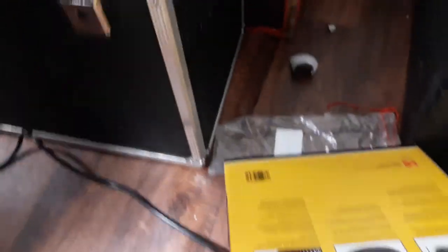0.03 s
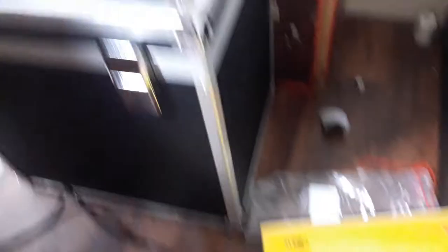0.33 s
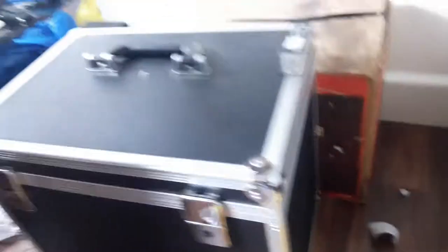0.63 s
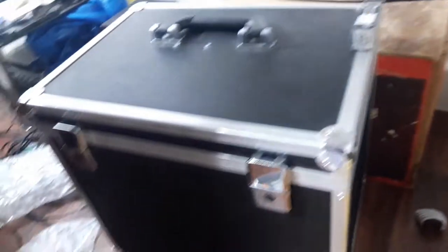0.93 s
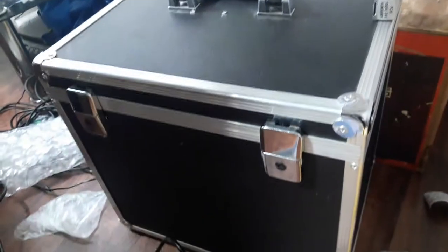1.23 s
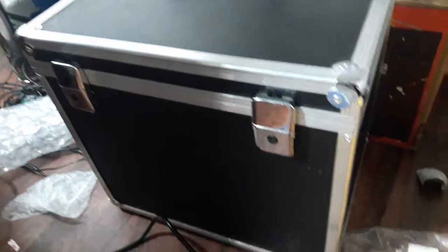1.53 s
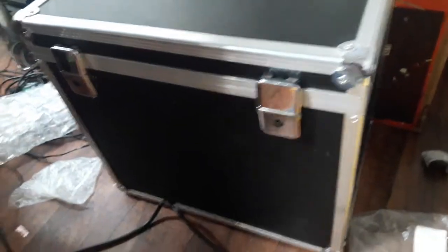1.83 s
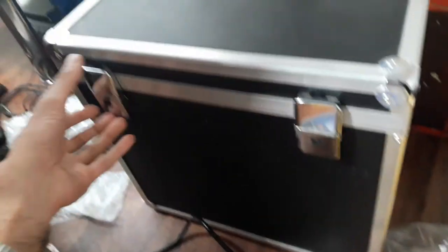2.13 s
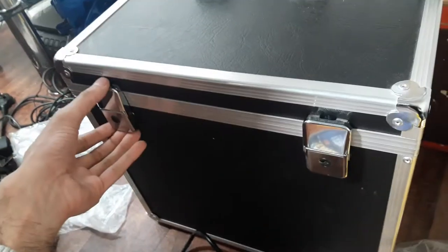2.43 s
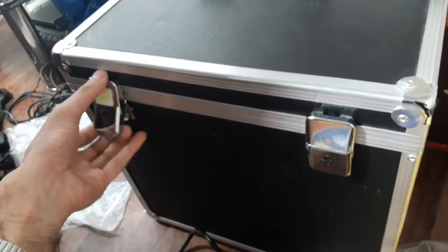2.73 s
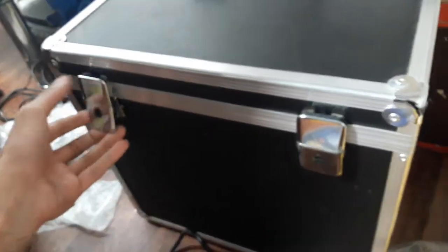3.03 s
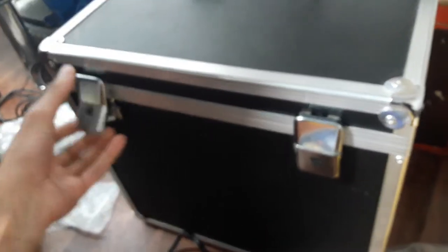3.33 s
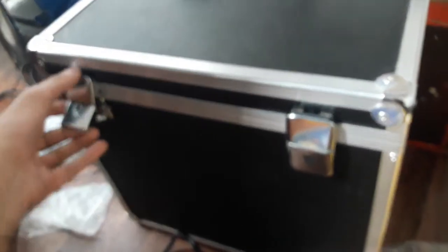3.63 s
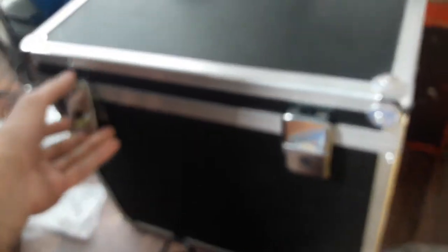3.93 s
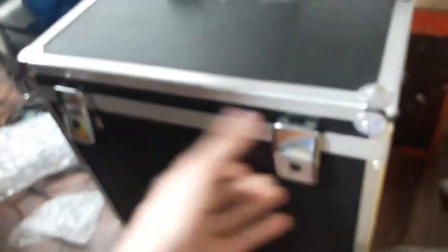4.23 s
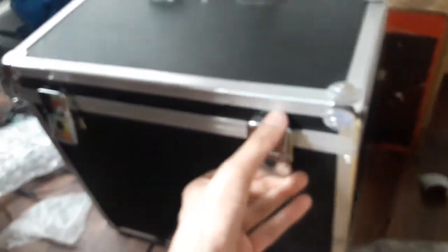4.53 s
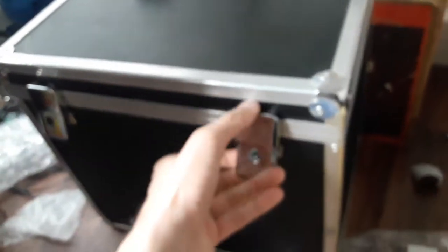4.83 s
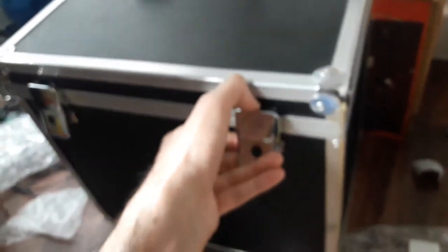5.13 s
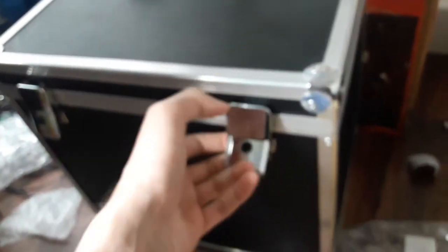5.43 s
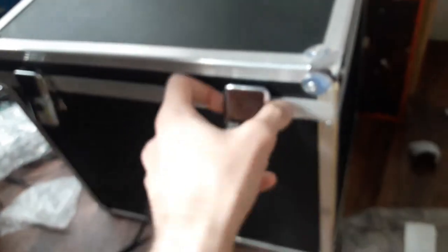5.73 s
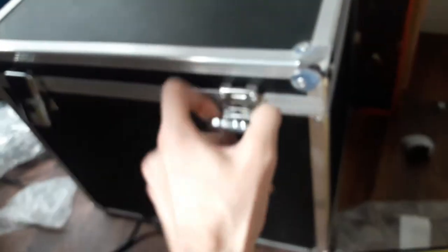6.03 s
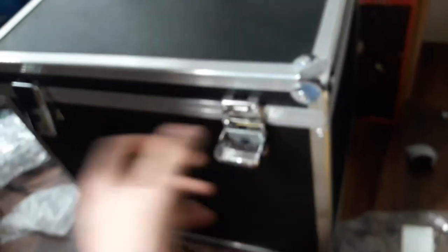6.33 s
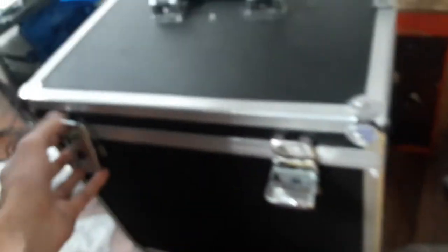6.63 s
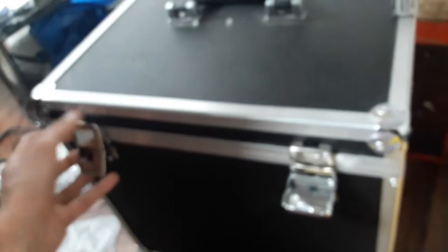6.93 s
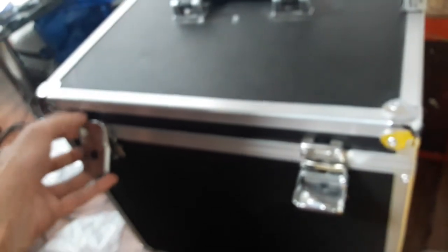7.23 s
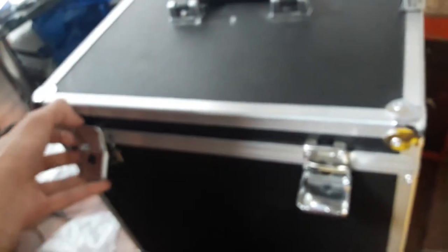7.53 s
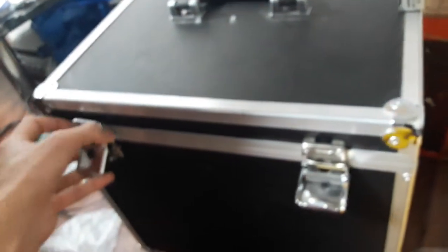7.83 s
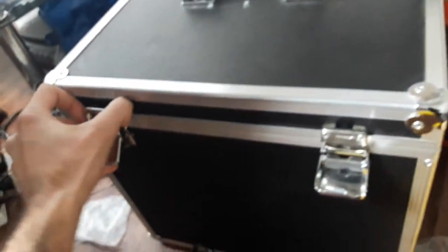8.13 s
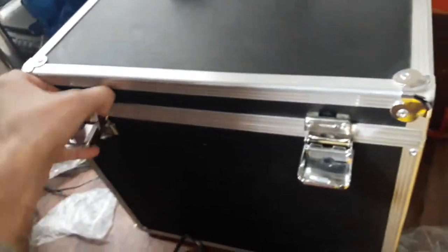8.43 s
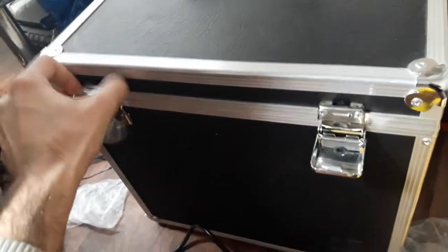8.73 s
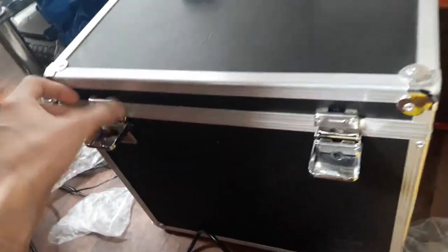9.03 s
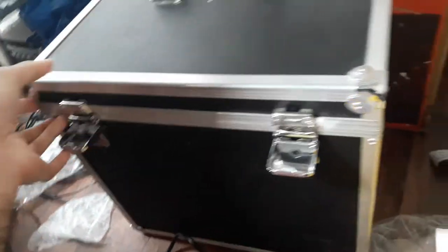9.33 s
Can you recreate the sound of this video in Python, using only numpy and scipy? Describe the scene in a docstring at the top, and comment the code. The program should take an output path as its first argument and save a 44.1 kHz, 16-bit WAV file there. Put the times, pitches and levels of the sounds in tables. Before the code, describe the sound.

The sound is close, in a small, quiet room. It opens with a brief cloth rustle, a couple of metal clicks and a faint low hum that fades by 0.7 seconds. Loose metal clinks from 1 to 1.6 seconds, with a short hollow clank at 1.2. From 2.7 to 5.7 seconds a hand works the steel latches of a flight case: irregular sharp clicks and small ticks, clustered around 3 and 4.7 seconds, with soft thuds from the plywood panels. At 6.2 seconds the first latch springs open with a loud, bright clatter. Faint finger scrapes and ticks follow, then clicks at about 7.7, 8 and 8.5 seconds. At 8.8 seconds the second latch snaps open with the loudest, slightly longer rattle and a low thump from the lid. A sleeve rustles softly throughout, over faint room tone.

```python
"""In a small, quiet room, a hand works the two steel latches of a flight case.
Levers and catches strike their plates, and each impact excites the damped modes of the steel.
Pushes set the plywood panels thudding, and each latch finally springs open with a loud clatter.
Before that, loose metal clinks and clanks. Friction makes fingers scrape and a sleeve rustle;
a low hum fades early, and a faint room tone remains."""
import sys
import numpy as np
from scipy import signal
from scipy.fft import rfft, irfft, next_fast_len
from scipy.io import wavfile
from scipy.ndimage import uniform_filter1d

SR = 44100
rng = np.random.default_rng(int(sys.argv[2]) if len(sys.argv) > 2 else 0)


def wrap_up_sound(samples):
    """Save the sound to the file named by the first command line argument, as 16-bit audio."""
    columns = np.atleast_2d(samples).T
    # keep every value between -1 and 1, then stretch to whole-number steps
    tamed = np.clip(columns, -1, 1)
    steps = np.round(tamed * 32767).astype(np.int16)
    wavfile.write(sys.argv[1], SR, steps)


N = 422919
TIME = np.arange(N) / SR

# pushes and bumps on the case: start_s, level_db
PUSHES = [(1.292, -39), (2.719, -37), (2.763, -44), (3.021, -49), (3.062, -38.5), (3.698, -54),
          (3.819, -56), (4.247, -36.5), (4.409, -46), (4.56, -46.5), (4.634, -37.5), (4.803, -38),
          (5.621, -41), (5.655, -55), (5.825, -44.5), (5.86, -45.5), (5.983, -43.5), (6.113, -41.5),
          (6.23, -31), (8.024, -48.5), (8.301, -44), (8.425, -41), (8.463, -31.5), (8.785, -17.5)]
# resonances of the plywood panels: pitch_hz, bandwidth_hz, gain_db
PANEL_MODES = [(106, 22, -6), (125, 12, 3), (160, 24, -4), (202, 12, 0), (255, 40, -10), (320, 40, -11),
               (378, 30, -9), (432, 20, -9)]


def latch_releases(rise_s=0.001, lead_s=0.01596, bounce_db=2.0, lid_hz=66.0, lid_rise_s=0.006):
    """Released elastic energy rattles the lever, shakes the panels and lifts the lid off its seal."""
    # latches springing open: start_s, hold_s, decay_s, level_db, treble_db, boom_db, jump_db
    releases = [(6.233, 0.024, 0.026, -14.5, 3.5, -25, -31.5),
                (8.793, 0.058, 0.034, -12.5, 4, -24.5, -14.5)]
    # spectrum of the rattling lever: frequency_hz, level_db
    rattle_spectrum = [(240, -44.5), (400, -16.5), (570, -9), (719, -6.5), (789, -6.5), (1160, -2.5),
                       (1560, -6), (2320, 5), (2930, -7.5), (5270, -12), (5960, -12.5), (7750, -16.5),
                       (8630, -26.5), (13300, -22), (16000, -31.5)]
    out, t = np.zeros(N), TIME[:SR // 2]
    for start, hold, decay, db, treble_db, boom_db, jump_db in releases:
        shaking = (1 - np.exp(-t / rise_s)) * np.exp(-np.maximum(t - hold, 0) / decay)
        bounces = from_db(bounce_db * smooth_noise(len(t), span=220))
        rattle = colour(chatter(len(t), per_s=5000, spread_db=-2.0), rattle_spectrum)
        rattle += (from_db(treble_db) - 1) * band(rattle, 3200, 20000, order=1)
        add(out, start, from_db(db) * shaking * bounces * rattle)
        panels = resonate(rng.standard_normal(len(t)) * shaking, PANEL_MODES)
        add(out, start - lead_s, at_level(panels, boom_db, hold + decay))
        jump = np.sin(2 * np.pi * lid_hz * t) * t / lid_rise_s * np.exp(1 - t / lid_rise_s)
        add(out, start - lead_s, from_db(jump_db) * jump)
    return out


def latch_clicks(contacts, crack_db=-14.5, right_latch_s=(4.4, 6.5), loose_until_s=2.0):
    """Impact excitation: a chattering force rings the steel; the harder the contact, the brighter."""
    # steel modes, damped by the fingers: pitch_hz, bandwidth_hz, left_latch_db, right_latch_db
    steel_modes = [(353.2, 27, -4.5, -10), (757, 170, -3, -5), (1053, 160, -4, -14),
                   (1594, 190, -0.5, -4.5), (1874, 560, -3, -3.5), (2340, 280, 9, 13), (2778, 800, 1.5, 6),
                   (3460, 1020, 5.5, 4.5), (4230, 1300, 2, -3), (5703, 270, 5.5, 1), (7840, 600, -15, -6),
                   (9210, 1700, -38, -2), (11100, 1000, -27, 2), (12300, 320, -19.5, 3),
                   (14400, 2400, -2, -7)]
    # limits of the knock, clack, chink and tick bands: edge_hz
    edges_hz = [330, 1600, 3200, 7500, 16000]
    # contact timbre, a row for each band: offset_db, db_per_hardness_db, loose_metal_db
    timbre = [(-11, -0.07, -2.5), (-1, 0, 1), (-6.5, 1.5, -1), (-15, 1.63, -10.5)]
    offset_db, per_hardness, loose_db = np.transpose(timbre)
    filters = [signal.butter(4, pair, "band", fs=SR, output="sos")
               for pair in zip(edges_hz, edges_hz[1:])]
    out, t = np.zeros(N), TIME[:SR // 16]
    for start, length, db, hardness, knock_db in contacts:
        on_right = right_latch_s[0] < start < right_latch_s[1]
        modes = [(hz, width, right if on_right else left) for hz, width, left, right in steel_modes]
        force = chatter(len(t), per_s=7000, spread_db=4.0) * np.exp(-(t / length) ** 2)
        corner_hz = np.clip(11000 * 2 ** (hardness / 6.4), 1500, .45 * SR)
        rounded = signal.sosfilt(signal.butter(1, corner_hz, fs=SR, output="sos"), force)
        steel = resonate(rounded, modes) + from_db(crack_db) * force
        levels = db + offset_db + hardness * per_hardness + loose_db * (start < loose_until_s)
        levels[0] += knock_db
        for sos, level_db in zip(filters, levels):
            add(out, start, at_level(signal.sosfilt(sos, steel), level_db, seconds=0.005))
    return out


def metal_contacts(jolt_s=3.6, jolt_knock_db=17, ticks_per_s=7, tick_s=0.003):
    """Impacts arise from lever strikes, from pushes that jolt the plate and from a loose catch."""
    # metal striking metal: start_s, chatter_s, level_db, hardness_db (below 0 dull, above 0 bright)
    strikes = [(0.0352, 0.012, -17, -15), (0.0536, 0.0018, -15.5, -2), (0.1896, 0.0012, -27, -11),
               (1.0628, 0.03, -31, 5), (1.0994, 0.0037, -20.5, 0.5), (1.157, 0.0072, -19, 5.5),
               (1.291, 0.0023, -26, 5.5), (1.3548, 0.0013, -28.5, 2), (1.5229, 0.0027, -25, 8),
               (1.556, 0.0023, -27, -1), (2.715, 0.0039, -21, -1), (2.722, 0.0029, -19.5, -1),
               (2.7345, .001, -25, 5.5), (2.7629, 0.0022, -26, 2.5), (2.901, 0.0078, -31, 0.5),
               (3.021, 0.0049, -13, -0.5), (3.0606, 0.0094, -17.5, -2), (3.321, 0.015, -35, -18),
               (3.333, .004, -19.5, -10), (3.3383, 0.00037, -24, 0.5), (3.696, 0.0055, -17, -8),
               (3.8192, 0.0033, -18, -4), (4.2463, .018, -26, -2), (4.6011, 0.0039, -36.5, 6),
               (4.6253, .0028, -22.5, -3.5), (4.6345, .0044, -28.5, 8.5), (4.656, 0.0042, -18, 5.5),
               (4.777, 0.003, -32, 0), (4.7807, 0.003, -18.5, 0.5), (4.8031, 0.0036, -19.5, 0.5),
               (4.8258, .012, -25, 2.5), (4.8987, 0.0047, -25.5, 4), (4.962, 0.0012, -29.5, -4),
               (5.4236, 0.0053, -17, 5), (5.6545, 0.016, -33.5, 1), (5.8607, .011, -36, -15),
               (5.9844, .0041, -45.5, 6.5), (5.9971, 0.002, -46, 7.5), (6.1136, 0.0024, -42, 8),
               (6.2245, .0042, -11.5, 0), (6.7079, 0.013, -39, -3.5), (7.0845, 0.0083, -49.5, 7),
               (7.119, 0.0031, -43.5, 3.5), (7.306, 0.0047, -42, -2.5), (7.6677, 0.0058, -22, -5),
               (7.7391, 0.005, -28, -57), (7.9633, 0.0037, -17.5, -4.5), (8.351, 0.00061, -47, 8.5),
               (8.4249, .0055, -35, 2.5), (8.4611, .004, -15.5, -13.5), (8.4653, .01, -24, 1),
               (8.759, 0.02, -25.5, 1.5), (8.773, .004, -22, -1.5), (8.784, .0056, -7.5, 0.5),
               (9.121, 0.0031, -48, 7.5)]
    # spans in which the fingers work the loose catch: start_s, end_s
    fiddling = [(2.4, 3.0), (4.55, 4.98), (8.3, 8.75)]
    jolt_hardness_db, tick_hardness_db = -5, 4.4
    contacts = [(*strike, 0) for strike in strikes]  # fifth column: knock_db, a lift of the lowest band
    for start, push_db in PUSHES:
        jolt_db = min(-29 + 2.34 * (push_db + 35), -26)  # grows steeply with the push, up to a ceiling
        contacts.append((start, jolt_s, jolt_db, jolt_hardness_db, jolt_knock_db))
    for begin, end in fiddling:
        starts = begin + np.cumsum(rng.exponential(1 / ticks_per_s, size=12))
        levels_db = rng.normal(-46, 1, size=12)
        contacts += [(s, tick_s, db, tick_hardness_db, 0) for s, db in zip(starts, levels_db) if s < end]
    return contacts


def case_thuds(push_s=0.016, judder_s=0.02, judder_db=-10.5):
    """A soft force pulse and the judder of the fingers drive the low modes of the panels."""
    out, t = np.zeros(N), TIME[:SR // 3]
    for start, db in PUSHES:
        push = at_level(np.exp(-t / push_s), 0, seconds=0.76)
        judder = band(rng.standard_normal(len(t)), 76, 530) * np.exp(-t / judder_s)
        force = push + at_level(judder, judder_db, seconds=0.93)
        add(out, start, at_level(resonate(force, PANEL_MODES), db, seconds=0.052))
    return out


def hollow_clank(case_db=-38.5, impact_s=0.00025):
    """Free vibration: a hollow metal part rings in inharmonic modes; the knock also reaches the case."""
    # knock on the part: start_s, level_db
    knocks = [(1.156, -20.5)]
    # its modes: pitch_hz, level_db, t60_s
    modes = [(458, -3, .18), (690, -6, .14), (1066, -2, .18), (1319, -6, .19), (1534, -5, .19),
             (2013, -7, .22), (2175, -2, .18), (2562, -5, .2), (2929, -10, .2)]
    out, t = np.zeros(N), TIME[:SR // 2]
    for start, db in knocks:
        for hz, mode_db, t60 in modes:
            ring = from_db(db + mode_db - 60 * t / t60) * np.sin(2 * np.pi * hz * t)
            add(out, start, ring * rng.choice([-1, 1]))
        panels = resonate(np.exp(-t / impact_s), PANEL_MODES)
        add(out, start, at_level(panels, case_db, seconds=0.042))
    return out


def finger_scrapes():
    """Stick-slip friction of skin on the case and levers makes short, gritty strokes."""
    # finger slides: middle_s, half_length_s, level_db, centre_hz
    slides = [(1.959, 0.0058, -40, 1370), (6.699, .024, -58.5, 2510), (6.724, 0.026, -53.5, 807),
              (7.536, 0.0033, -45.5, 2700), (6.89, 0.0096, -55, 378), (6.921, 0.015, -52, 11000)]
    out, t = np.zeros(N), TIME[:SR // 5]
    for middle, half, db, hz in slides:
        grit = rms_one(band(chatter(len(t), per_s=4800, spread_db=5.0), hz / 2, hz * 2))
        swell = np.exp(-((t - t.mean()) / half) ** 2)
        add(out, middle - t.mean(), from_db(db) * grit * swell)
    return out


def sleeve_rustle(still_db=-70.5, rise_share=0.49, flutter_db=1.0, treble_hz=3500.0):
    """Friction of cloth fibres gives a dense grain; the powers of the arm's movements add."""
    # arm movements: fastest_s, slowing_s, level_db, treble_db
    movements = [(0.0, 0.095, -25, -0.5), (.4, 0.39, -45.5, 8), (1.35, 0.48, -45, -2.5),
                 (1.98, 0.17, -47, 9.5), (2.55, 0.68, -47.5, -2), (3.45, 0.46, -51, -50),
                 (4.18, 0.15, -62.5, 17.5), (4.287, 0.054, -38.5, 0.5), (4.7, 0.6, -51, 2.5),
                 (5.798, 0.63, -56, 7), (7.84, 0.36, -48, 3), (8.58, .35, -53.5, 3), (9.57, 0.22, -54, 2.5)]
    # spectrum of rubbing cloth: frequency_hz, level_db
    cloth_spectrum = [(30, -4), (130, 7.5), (300, 1.5), (600, -4), (1500, -4.5), (2300, 4.5), (3200, -8),
                      (4300, -1.5), (5200, -9.5), (6200, -5.5), (7600, -11), (8700, -27.5), (10500, -21),
                      (13500, -15.5)]
    body_power = treble_power = from_db(still_db) ** 2
    for fastest, slowing, db, treble_db in movements:
        width = np.where(TIME < fastest, rise_share * slowing, slowing)
        power = from_db(db) ** 2 / (1 + ((TIME - fastest) / width) ** 2 / 4) ** 6
        body_power = body_power + power
        treble_power = treble_power + power * from_db(treble_db) ** 2
    flutter = from_db(flutter_db * smooth_noise(N, span=900))
    grain = colour(chatter(next_fast_len(N), per_s=14000, spread_db=3.5), cloth_spectrum)[:N]
    hiss = band(grain, treble_hz, SR / 2, order=1)
    return flutter * (np.sqrt(body_power) * (grain - hiss) + np.sqrt(treble_power) * hiss)


def reverberation(x, build_s=0.002):
    """A diffuse field of reflections builds quickly and decays exponentially in each band."""
    # room response: frequency_hz, level_db (relative to the direct sound), t60_s
    room = [(100, -14, 0.42), (324, 4, 0.25), (1010, -5, 0.27), (2130, -9.5, 0.31), (4540, -6.5, 0.32),
            (8000, -6.5, 0.28), (15000, -18, 0.37)]
    t, response = TIME[:SR * 2 // 3], 0
    edges = np.geomspace(60, 17000, 17)
    for low, high in zip(edges, edges[1:]):
        hz = np.sqrt(low * high)
        envelope = from_db(-60 * t / at_hz(room, hz, column=2)) * (1 - np.exp(-(t / build_s) ** 2))
        tail = band(rng.standard_normal(len(t)), low, high) * envelope
        response = response + at_level(tail, at_hz(room, hz), 2 * (high - low) / SR ** 2)
    return signal.fftconvolve(x, response)[:N]


def hum(pitch_hz=70.0, level_db=-53.0, fade_at_s=0.62, fade_s=0.04):
    """A low pure tone holds briefly, then fades out."""
    fade = (1 - np.tanh((TIME - fade_at_s) / (2 * fade_s))) / 2
    return from_db(level_db) * np.sin(2 * np.pi * pitch_hz * TIME) * fade


def room_tone(level_db=-68.0):
    """Stationary broadband noise, strongest in the bass, forms the ambient floor."""
    # ambient spectrum: frequency_hz, level_db
    spectrum = [(40, -8), (125, 2), (300, -2), (500, -9), (1400, -11), (2300, -5), (7200, -14), (9500, -29),
                (14000, -22)]
    return from_db(level_db) * colour(rng.standard_normal(next_fast_len(N)), spectrum)[:N]


def resonate(x, modes):
    """Modal superposition: damped resonators in parallel, their gains varying from blow to blow."""
    out = np.zeros(len(x))
    for k, (hz, width, db) in enumerate(modes):
        radius = np.exp(-np.pi * width / SR)
        gain = (-1) ** k * from_db(db + rng.standard_normal()) * (1 - radius ** 2) / 2
        feedback = [1, -2 * radius * np.cos(2 * np.pi * hz / SR), radius ** 2]
        out += signal.lfilter([gain, 0, -gain], feedback, x + 1e-18)
    return out


def chatter(size, per_s, spread_db):
    """Shot noise: tiny impulses, random in time, strength and sign; rms 1."""
    touches = rng.random(size) < per_s / SR
    strengths = from_db(spread_db * np.minimum(rng.exponential(1, size), 3))
    return rms_one(touches * strengths * rng.choice([-1, 1], size))


def smooth_noise(size, span):
    """A moving average over span samples turns noise into a slow fluctuation; rms 1."""
    return rms_one(uniform_filter1d(rng.standard_normal(size), size=span))


def colour(x, spectrum):
    """Shape a steady sound by a spectrum, rolling off below its first point; rms 1."""
    hz = np.maximum(np.fft.rfftfreq(len(x), 1 / SR), 1)
    fade_below = 1 / (1 + (spectrum[0][0] / hz) ** 2)
    return rms_one(irfft(rfft(x) * from_db(at_hz(spectrum, hz)) * fade_below, len(x)))


def band(x, low, high, order=2):
    """Causal band-pass between two frequencies in Hz."""
    sos = signal.butter(order, [low, min(high, .48 * SR)], "band", fs=SR, output="sos")
    return signal.sosfilt(sos, x)


def from_db(db):
    """Decibels to amplitude gain."""
    return 10 ** (np.asarray(db) / 20)


def rms_one(x):
    """Scale to unit power."""
    return x / np.sqrt(np.mean(x ** 2) + 1e-20)


def at_level(x, db, seconds):
    """Give x the energy of a sound of this level and length."""
    return x * from_db(db) * np.sqrt(seconds * SR / (np.sum(x ** 2) + 1e-20))


def at_hz(points, hz, column=1):
    """Interpolate a table on a log-frequency axis."""
    points = np.array(points)
    return np.interp(np.log(hz), np.log(points[:, 0]), points[:, column])


def add(out, start, sound):
    """Mix a sound in at a time in seconds."""
    i = max(0, round(start * SR))
    out[i:i + len(sound)] += sound[:max(0, N - i)]


def scene(directions=3):
    """Superposition of the direct sound of latches and case, their reflections and the background."""
    case = case_thuds() + hollow_clank() + latch_releases() + finger_scrapes()
    background = sleeve_rustle() + hum() + room_tone()
    contacts = metal_contacts()
    # the steel radiates a different fine spectrum each way, so its reflections blend to a smooth tail
    radiated = [latch_clicks(contacts) for _ in range(directions)]
    reflections = sum(reverberation(case + clicks) for clicks in radiated) / np.sqrt(directions)
    return (case + radiated[0] + reflections + background)[None]


def record(dry, cutoff_hz=15900):
    """Soft saturation rounds the loudest peaks, and a steep low-pass cuts the highest treble."""
    rounded = dry / (1 + dry ** 6) ** (1 / 6)
    return signal.sosfilt(signal.ellip(10, .2, 85, cutoff_hz, fs=SR, output="sos"), rounded)


dry = scene()
out = record(dry)
wrap_up_sound(out)
```